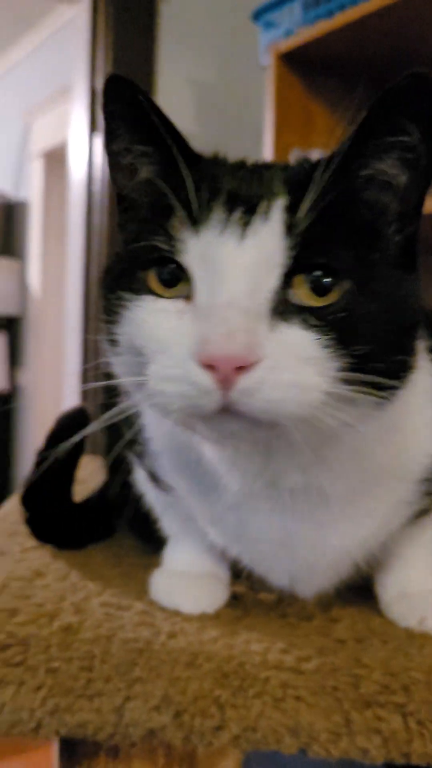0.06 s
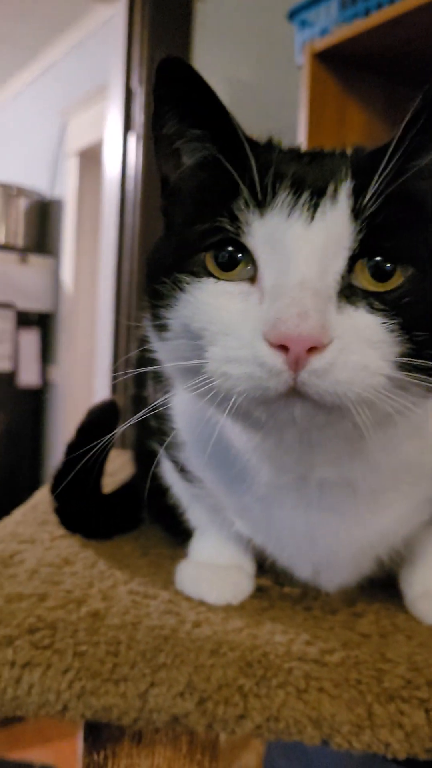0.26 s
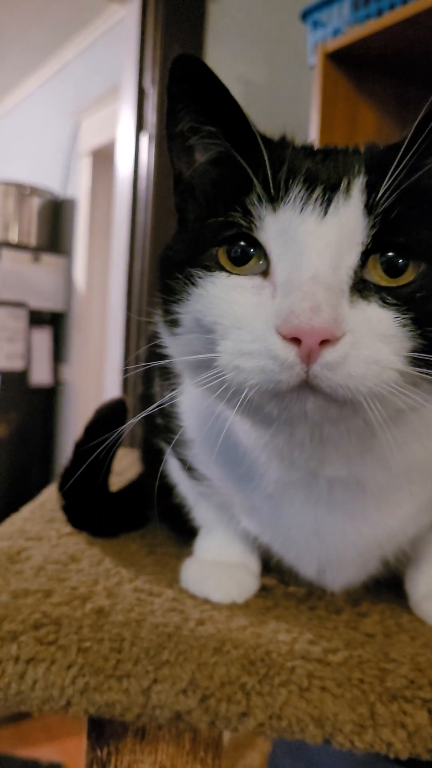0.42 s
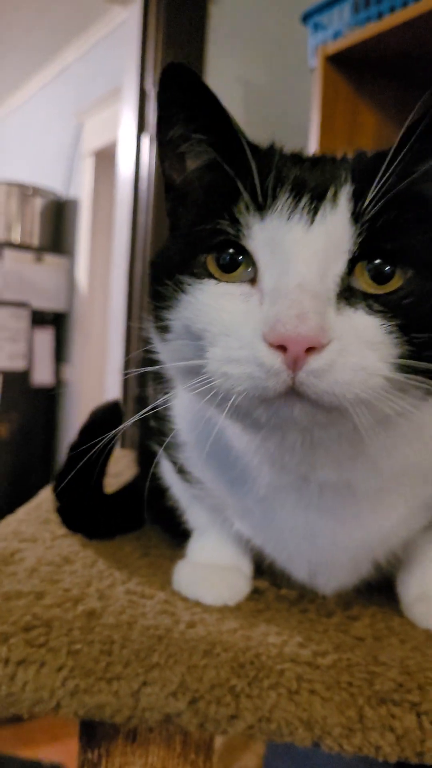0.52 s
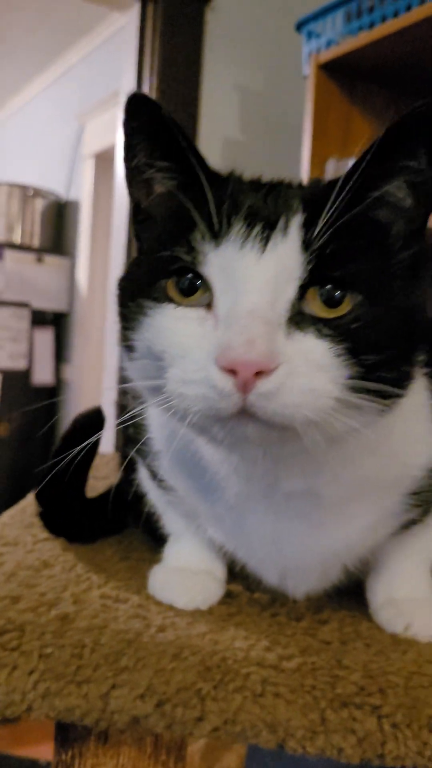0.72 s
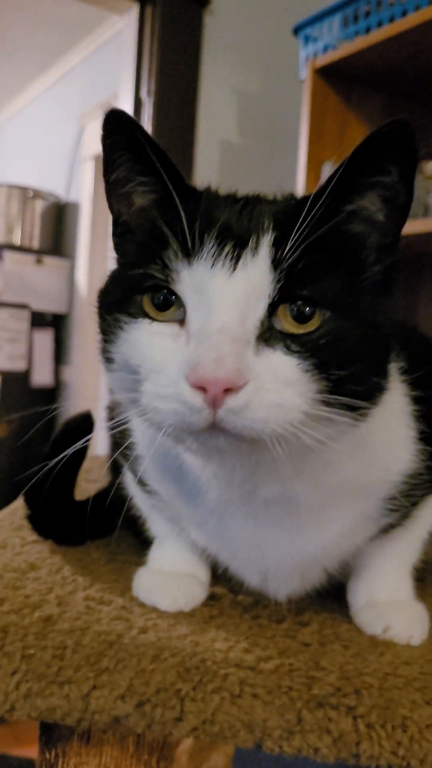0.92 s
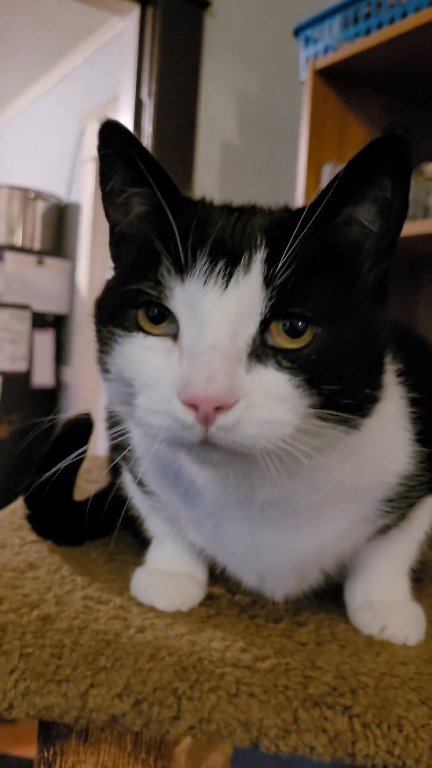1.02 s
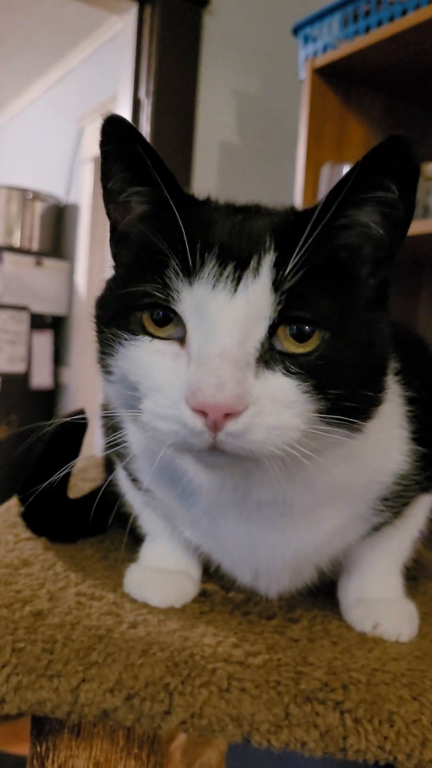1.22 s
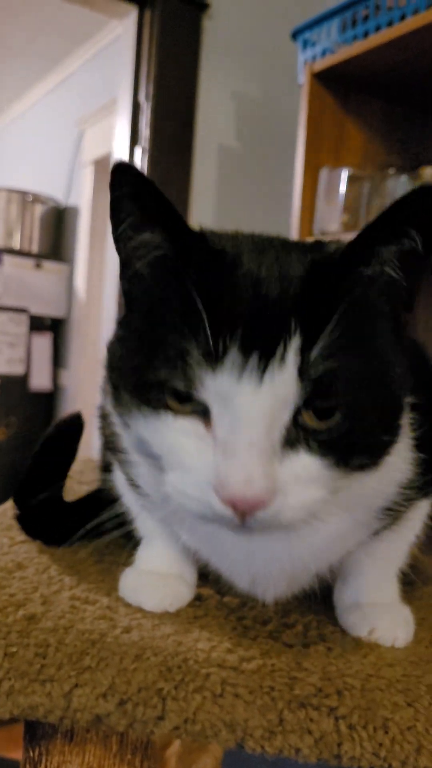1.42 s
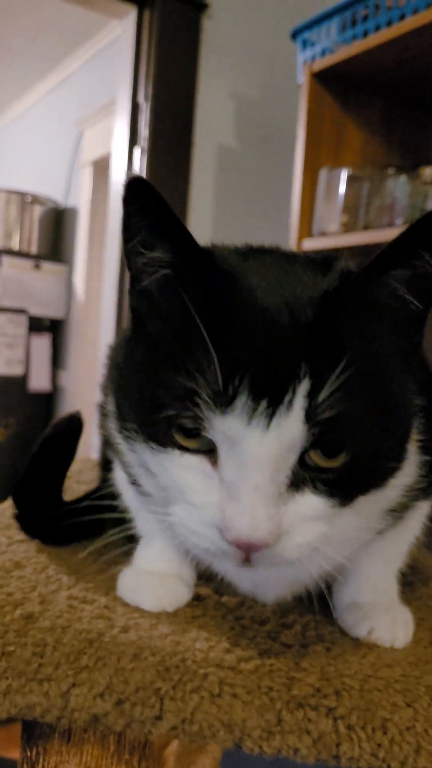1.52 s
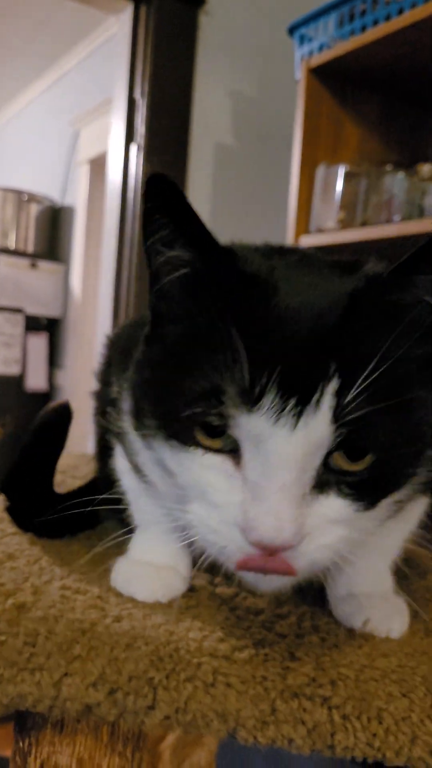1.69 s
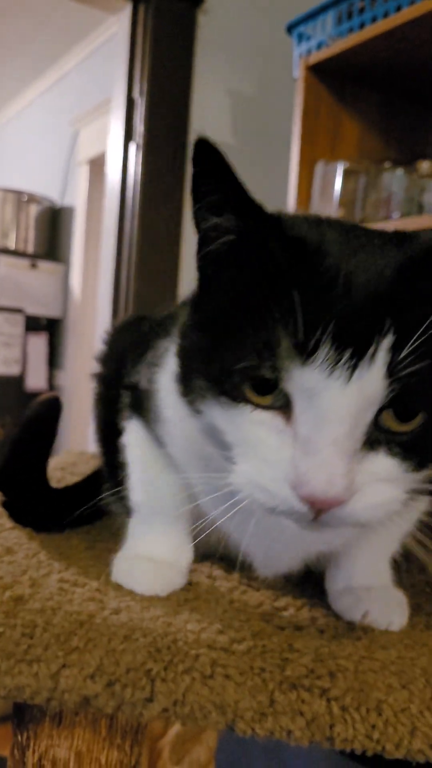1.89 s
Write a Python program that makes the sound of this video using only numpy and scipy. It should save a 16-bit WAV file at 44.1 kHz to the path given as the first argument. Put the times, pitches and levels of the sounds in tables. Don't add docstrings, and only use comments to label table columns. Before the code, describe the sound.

Loud close cat purr swells and holds for over a second, then ends in small wet lip smacks

```python
import sys
import numpy as np
from scipy import signal
from scipy.fft import rfft, irfft, next_fast_len
from scipy.io import wavfile
from scipy.ndimage import uniform_filter1d

SR = 44100
rng = np.random.default_rng(int(sys.argv[2]) if len(sys.argv) > 2 else 0)


def master_out(mix):
    frames = np.transpose(np.atleast_2d(mix))
    ceiling = np.clip(frames, -1, 1)
    pcm = np.round(ceiling * 32767).astype(np.int16)
    wavfile.write(sys.argv[1], SR, pcm)


def volts_from_db(level):
    exponent = np.asarray(level, float) / 20
    return 10 ** exponent


N = 85995


def evened(x):
    return x / np.sqrt(np.mean(x ** 2) + 1e-20)


def read_log_hz(points, hz):
    f, value = np.transpose(points)
    return np.interp(np.log(hz + 1), np.log(f + 1), value)


def over_time(points):
    return np.interp(np.arange(N) / SR, *np.transpose(points))


def add(mix, start_s, sound):
    part = mix[round(start_s * SR):][:len(sound)]
    part += sound[:len(part)]


def resonate(x, hz, width_hz):
    turn = np.exp(2j * np.pi * np.cumsum(hz * np.ones(len(x))) / SR)
    r = np.exp(-np.pi * width_hz / SR)
    low = signal.lfilter([(1 - r) ** 2], [1, -2 * r, r * r], x / turn + 1e-18)
    return 2 * (turn * low).real


def ramp(t, ms):
    return np.sin(np.pi / 2 * np.clip(t / ms * 1000, 0, 1)) ** 2


# frequency in Hz, level in dB per Hz.
AIR_TONE = [(30, -21), (90, -10), (330, -1), (640, -16), (950, -9.5), (1450, -21), (4500, -25),
            (15700, -34)]
# frequency in Hz, correlation.
AIR_LIKENESS = [(60, 0.7), (240, 0.42), (950, 0.46), (3770, 0.1), (15000, 0.21)]
# frequency in Hz, level in dB, width in Hz.
MAINS_HUM = [(65.4, -73.5, 3.5), (133, -82, 11), (270.8, -70.5, 6.9)]
# time in seconds, level in dB.
DRAUGHT_LEVEL = [(0, -96), (0.201, -66), (0.268, -59.5), (0.478, -53.5), (.62, -57), (1.102, -59),
                 (1.449, -62), (1.55, -82), (1.95, -68.5)]


def room_tone():
    frames, hz = N // 256 + 5, np.fft.rfftfreq(1024, 1 / SR)
    a, b, c, d, patches = rng.standard_normal((frames, 513, 5)).T
    patches = uniform_filter1d(patches, size=10, axis=0)
    patches = evened(uniform_filter1d(patches, size=10, axis=1))
    same = np.clip(read_log_hz(AIR_LIKENESS, hz), -1, 1)[:, None]
    left = a + 1j * b
    right = same * left + np.sqrt(1 - same ** 2) * (c + 1j * d)
    z = np.array([left, right]) * volts_from_db(read_log_hz(AIR_TONE, hz)[:, None] + 0.81 * patches)
    tone = volts_from_db(-67.5) * evened(signal.istft(z, nperseg=1024, noverlap=768)[1][:, :N])
    hum = sum(volts_from_db(db) * evened(resonate(rng.standard_normal(N), f, w)) for f, db, w in MAINS_HUM)

    def rumble(z):
        main = resonate(resonate(z, 55.6, 8.2), 55.6, 8.2)
        return evened(main + 0.065 * resonate(z, 48, 12) + 0.68 * resonate(z, 125.6, 33))

    mid, side = (rumble(z) for z in rng.standard_normal((2, N)))
    stereo = mid * volts_from_db([[-.8], [.8]]) + 0.2 * side * [[1], [-1]]
    return tone + hum + volts_from_db(over_time(DRAUGHT_LEVEL)) * stereo


# delay in ms, level in dB, sign.
WALL_ECHOES = [
    (12.84, -33.5, 1),
    (19.89, -21.5, -1),
    (26.98, -22, 1),
]
# frequency in Hz, t60 in seconds.
ROOM_DECAY = [(100, 0.71), (400, 0.11), (1500, 0.43), (8000, 0.36)]


def room(x):
    near = np.zeros(N)
    for delay_ms, db, sign in WALL_ECHOES:
        add(near, delay_ms / 1000, sign * volts_from_db(db) * x.mean(0))
    near = signal.lfilter(*signal.butter(1, (296, 740), "band", fs=SR), near)
    taps = np.zeros((3, 16000))
    at = np.arange(300, 15980, 20) + rng.integers(0, 20, (3, 784))
    np.put_along_axis(taps, at, rng.choice([-1., 1.], at.shape), 1)
    hz, t, z = signal.stft(taps, SR, nperseg=256)
    tail = signal.istft(z * volts_from_db(-60 * t / read_log_hz(ROOM_DECAY, hz)[:, None]), SR, nperseg=256)[1]
    tail = tail[0] + 1.2 * tail[1:]
    tail_db = -14
    return near + volts_from_db(tail_db) * signal.fftconvolve(x, tail / np.linalg.norm(tail[0]), axes=1)[:, :N]


# frequency in Hz, left minus right in dB.
PORT_LEVEL = [(60, -2.5), (92, 5.5), (140, -5.5), (210, 10), (330, -3.5), (500, 8), (770, -8), (1170, 7.5),
              (1790, -0.5), (2740, 2), (4190, 1), (6410, -6.5), (9810, 0), (15000, -0.5)]
# frequency in Hz, left lead in radians.
PORT_PHASE = [(0, 0), (690, 0.1963), (950, 0.98), (1380, 1.28), (2070, 1.16), (3620, 4.5), (4910, 9),
              (5340, 11), (7410, 10), (8960, 11), (10200, 11.5), (12100, 14.5), (13100, 6), (15200, 25.5)]


def ports(x):
    size = next_fast_len(N + 2048)
    hz = np.fft.rfftfreq(size, 1 / SR)
    half = volts_from_db(read_log_hz(PORT_LEVEL, hz) / 2) * np.exp(.5j * read_log_hz(PORT_PHASE, hz))
    return irfft(rfft(x, size) * np.array([half, 1 / half]), size)[:, :N]


# time in seconds, level in dB.
INWARD_LEVEL = [
    (0, -70.5),
    (.1, -67),
    (.2, -100.5),
    (1.7, -80),
    (1.8, -71.5),
    (1.85, -60),
    (1.95, -63),
]
# frequency in Hz, width in Hz, level in dB.
CHEST_MODES = [(146, 13, -12), (260.4, 68, 5.5), (430, 120, -3)]


def inward():
    pulses_per_s = 30
    wander = evened(uniform_filter1d(rng.standard_normal(N), size=1200))
    turns = np.cumsum(pulses_per_s * (1 + 0.13 * wander)) / SR
    drive = np.exp(-(turns % 1) / 0.29) * rng.standard_normal(N)
    chest = sum(volts_from_db(db) * evened(resonate(drive, f, w)) for f, w, db in CHEST_MODES)
    return volts_from_db(over_time(INWARD_LEVEL)) * evened(chest)


# start in seconds, level in dB.
LIP_SMACKS = [
    (1.5485, -56),
    (1.5537, -52.5),
    (1.5752, -45),
    (1.5803, -68),
]
# frequency in Hz, level in dB, t60 in seconds.
MOUTH_MODES = [(973, -9, 0.13), (1247, -9.5, 0.12), (1546, 0.5, 0.14), (2290, 9, 0.06), (2524, 8, 0.061),
               (2920, 11, 0.093), (3850, -10, 0.026), (4990, 15, 0.017), (6940, -3, 0.021),
               (7100, -23, .02)]
# start in seconds, level in dB.
SALIVA_TICKS = [(1.5502, -64), (1.555, -53.5), (1.5592, -48), (1.57, -56), (1.5775, -56), (1.5798, -67),
                (1.586, -56.5), (1.7103, -58), (1.7626, -66.5), (1.7965, -63), (1.8065, -64), (1.8096, -58),
                (1.843, -65)]
# start in seconds, level in dB, frequency in Hz, width in Hz.
TONGUE_LICKS = [(1.71, -76, 6500, 3500), (1.727, -53.5, 5700, 250), (1.738, -67, 3800, 250),
                (1.764, -48.5, 5490, 500), (1.76, -60, 5700, 1820), (2, -65.5, 6800, 1600),
                (0.88, -63.5, 7200, 1500), (1.769, -65, 4060, 250), (1.79, -61, 5100, 500),
                (1.794, -69, 4020, 300), (1.817, -66, 4260, 250), (1.86, -68, 6950, 1600),
                (1.895, -63, 2760, 250)]
# time in seconds, level in dB.
WET_HISS = [(0, -110), (1.539, -100), (1.559, -68), (1.609, -73), (1.681, -110), (1.705, -103), (1.72, -92),
            (1.77, -83), (1.86, -86), (1.95, -94)]


def lips():
    out, t = np.zeros(N), np.arange(6000) / SR

    def noise(hz, width_hz):
        return evened(resonate(rng.standard_normal(len(t)), hz, width_hz))

    for (s, db), turns in zip(LIP_SMACKS, rng.random((len(LIP_SMACKS), len(MOUTH_MODES)))):
        ring = sum(volts_from_db(level - 60 * t / t60) * np.sin(2 * np.pi * (f * t + p))
                   for (f, level, t60), p in zip(MOUTH_MODES, turns))
        puff = volts_from_db(-60 * t / 0.066) * noise(5200, 2600)
        add(out, s, volts_from_db(db - 14.5) * ramp(t, 0.89) * (ring + 1.1 * puff))
    for (s, db), hz in zip(SALIVA_TICKS, rng.uniform(4900, 7500, len(SALIVA_TICKS))):
        add(out, s, volts_from_db(db - 60 * t / 0.0072) * noise(hz, 5100))
    for s, db, hz, w in TONGUE_LICKS:
        add(out, s, volts_from_db(db - 60 * t / 0.047) * ramp(t, 2200 / w) * noise(hz, w))
    low, high = rng.standard_normal((2, N))
    hiss = evened(resonate(low, 3330, 850)) + 0.28 * evened(resonate(high, 8700, 3300))
    return out + volts_from_db(over_time(WET_HISS)) * hiss


# Hz before and Hz after the head turns, width in Hz,
# dB before, dB after, dB per dB of air.
NOSE_MODES = [(5440, 5210, 300, -9, -6, -.3), (6300, 6500, 1100, 0, -3, 0), (7450, 7500, 1100, -1, 0, .25),
              (8460, 8400, 700, -7, -6, .3), (12900, 12900, 1400, -8, -15, .35),
              (12000, 12000, 900, -20, -3, .7), (14500, 14200, 1800, -12, -11, .8),
              (10300, 10500, 2500, -11, -10, .6)]


def nose(air):
    t = np.arange(N) / SR
    turn_s, turn_length_s, same = .73, .14, .76
    turn = np.clip((t - turn_s) / turn_length_s + .5, 0, 1)
    flow_db = np.interp(t, *np.transpose(BREATH_EFFORT)[[0, 2]]) + 55

    def colour(z):
        return sum(volts_from_db(d0 + (d1 - d0) * turn + lift * flow_db)
                   * resonate(z, f0 + (f1 - f0) * turn, w) * np.sqrt(1000 / w)
                   for f0, f1, w, d0, d1, lift in NOSE_MODES)

    mid, left, right = (colour(z) for z in air * rng.standard_normal((3, N)))
    hiss = same * mid + np.sqrt(1 - same ** 2) * np.array([left, right])
    return np.sqrt(np.mean(air ** 2)) * evened(hiss)


# start in seconds, open time in ms, level in dB, pitch in Hz.
OPENINGS = [(0.1156, 6.3, -42.2, 349), (0.1458, 6.0, -31.9, 354), (0.1752, 9.6, -29.0, 292),
            (0.2059, 12.3, -27.2, 271), (0.2371, 13.0, -24.5, 279), (0.2698, 12.9, -23.3, 295),
            (0.305, 10.1, -23.8, 317), (0.3345, 13.8, -20.8, 307), (0.3653, 15.6, -21.0, 296),
            (0.3998, 13.3, -20.5, 299), (0.4326, 14.2, -19.2, 305), (0.4646, 13.8, -19.7, 313),
            (0.4986, 13.4, -19.1, 320), (0.5305, 15.1, -19.5, 330), (0.5652, 13.1, -18.9, 334),
            (0.5954, 16.2, -17.0, 317), (0.6276, 16.3, -16.4, 320), (0.662, 15.3, -17.7, 331),
            (0.6955, 15.0, -17.1, 341), (0.7303, 12.2, -19.2, 351), (0.7603, 15.4, -16.5, 335),
            (0.7934, 15.4, -16.4, 333), (0.827, 14.9, -17.0, 341), (0.8616, 15.0, -17.6, 348),
            (0.8936, 15.7, -16.0, 333), (0.9275, 15.5, -16.4, 335), (0.9635, 12.6, -17.3, 342),
            (0.9964, 14.8, -17.0, 337), (1.0286, 15.2, -16.9, 338), (1.0616, 15.2, -15.9, 335),
            (1.0958, 15.0, -16.6, 340), (1.131, 15.0, -16.6, 337), (1.1642, 15.4, -16.0, 331),
            (1.1973, 18.1, -16.0, 326), (1.2348, 12.7, -17.8, 341), (1.2701, 14.2, -17.6, 344),
            (1.3021, 15.7, -16.2, 324), (1.3375, 15.4, -16.8, 327), (1.3744, 12.9, -19.0, 326),
            (1.4093, 10.2, -22.2, 323), (1.4459, 7.6, -23.5, 320), (1.4783, 10.6, -28.4, 284)]
# time in seconds, effort in dB, air in dB.
BREATH_EFFORT = [
    (.11, -38.5, -81),
    (.14, -36.5, -74),
    (.2, -28, -66.5),
    (0.44, -23, -60),
    (.61, -18, -55),
    (.9, -17, -56),
    (1.34, -16.5, -55),
    (1.44, -25, -62),
    (1.48, -31, -69),
]
# multiple of pitch, dB at full effort, dB gained per dB of effort,
# swell towards the closing, phase in radians.
FOLD_OVERTONES = [(1, 0, 0, 0, 0), (2, -8, .6, .1, -.55), (3, -24, .5, .2, 1.3), (4, -39, .6, .3, -2.),
                  (6, -52, 1.5, .3, 1.)]
# frequency in Hz, width in Hz, level in dB, dB per dB of effort.
THROAT_RASP = [(156, 45, -40.5, -1), (454, 148, -29.5, -0.94), (1093, 240, -33.5, 0.22),
               (2030, 620, -56.5, 8), (2775, 1300, -54.5, 2), (3970, 2700, -75, 10)]
# frequency in Hz, gain in dB.
HEAD_GAIN = [(60, -24.5), (205, -27), (265, -4.5), (310, 0), (440, 0.5), (515, -18.5), (590, -5.5),
             (800, 1)]


def purr():
    voice, rasp, air = np.zeros((3, N))
    time_s, effort, flow = np.transpose(BREATH_EFFORT)
    rise_ms, stop_ms, snap_ms, linger_ms = 1.8, 1.87, 1.0, 2.4
    start_share, crest, glide, first_peak_rad = 0.69, 0.75, 0.1, 3.5
    flutter_ms, air_lead_ms = 8.8, .7
    for (start, ms, db, hz), chance in zip(OPENINGS, rng.standard_normal(len(OPENINGS))):
        usual_db, air_db = np.interp(start, time_s, effort), np.interp(start, time_s, flow)
        length = ms / 1000
        t = np.arange(0, length + linger_ms / 1000, 1 / SR)
        u = t / t[-1]
        gate = ramp(t, rise_ms) * ramp(length - t, stop_ms)
        late = ramp(t, snap_ms) * ramp(t[-1] - t, stop_ms + linger_ms)
        grow = start_share + (1 - start_share) * np.minimum(u / crest, 1)
        phase = 2 * np.pi * np.cumsum(hz * (1 + glide * (t - length / 2) / 0.016)) / SR
        bow = .8 * (2 * u - 1) ** 2 + .1 * (db + 17)
        buzz = 0
        for k, level, lift, swell, lag in FOLD_OVERTONES[1:]:
            swelling = volts_from_db(level + lift * (db + 14.5)) * (1 - swell + 2 * swell * u)
            buzz = buzz + swelling * np.cos(k * (phase - first_peak_rad) + lag + bow)
        burst = volts_from_db(db) * (gate * grow * np.cos(phase - first_peak_rad) + 0.79 * late * buzz)
        add(voice, start, burst)
        add(voice, start + flutter_ms / 1000, -volts_from_db(-17 + 2.65 * (db + 15.5)) * burst)
        add(rasp, start, volts_from_db(db) * late)
        puffs = np.exp(.8 * (np.cos(phase - 2.1) - .5))
        puffs = puffs * ramp(t, 0.59) * ramp(length + 0.00033 - t, 2.1)
        add(air, start - air_lead_ms / 1000, volts_from_db(air_db + 1.1 * (db - usual_db) + 0.23 * chance) * puffs)
    voice = irfft(rfft(voice) * volts_from_db(read_log_hz(HEAD_GAIN, np.fft.rfftfreq(N, 1 / SR))), N)
    rasp += volts_from_db(-6.5) * uniform_filter1d(rasp, size=1500)
    air = air + volts_from_db(-8) * uniform_filter1d(air, size=1500)
    effort_db = np.interp(np.arange(N) / SR, time_s, effort) + 17

    def throat():
        return sum(volts_from_db(db + lift * effort_db) * rasp * evened(resonate(rng.standard_normal(N), f, w))
                   for f, w, db, lift in THROAT_RASP)

    mid, left, right = throat(), throat(), throat()
    same = .88
    return voice + same * mid + np.sqrt(1 - same ** 2) * np.array([left, right]), air


def scene():
    voice, air = purr()
    cat = ports(voice + nose(air) + inward() + lips())
    return cat + room(cat) + room_tone()


def roll_off(x):
    return signal.sosfilt(signal.butter(12, 15710, fs=SR, output="sos"), x)


def record(dry):
    low_pass = signal.firwin(511, 15800, window=("kaiser", 9), fs=SR)
    mix = signal.oaconvolve(dry, low_pass[None], "same")
    return roll_off(mix)


dry = scene()
out = record(dry)
master_out(out)
```